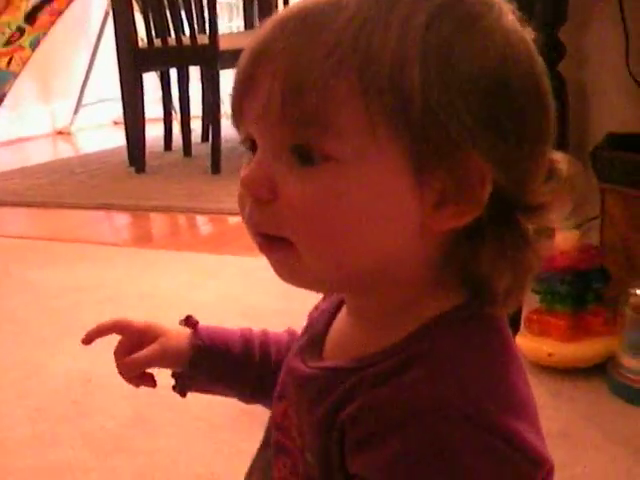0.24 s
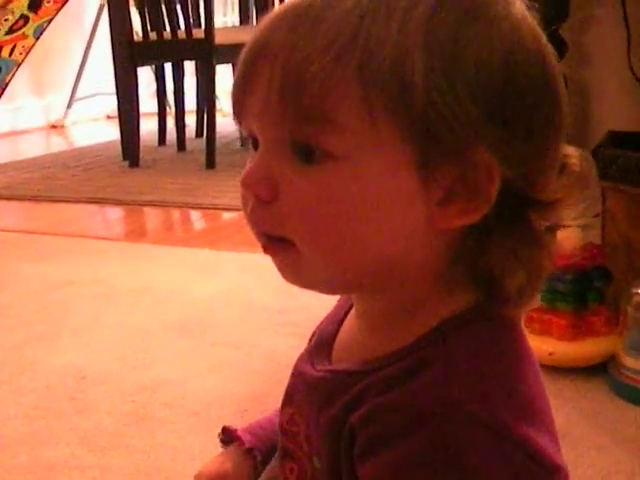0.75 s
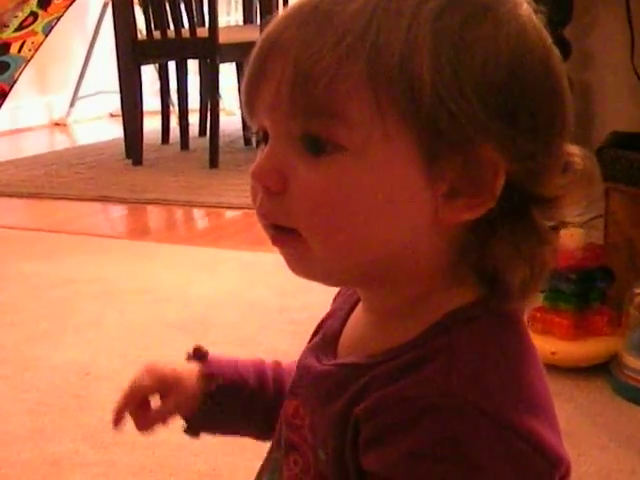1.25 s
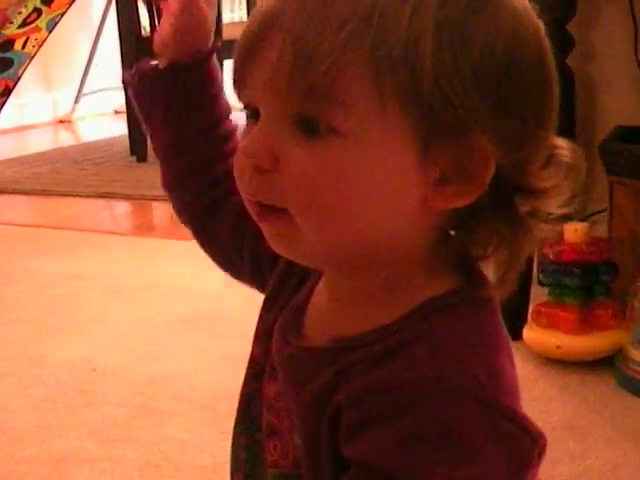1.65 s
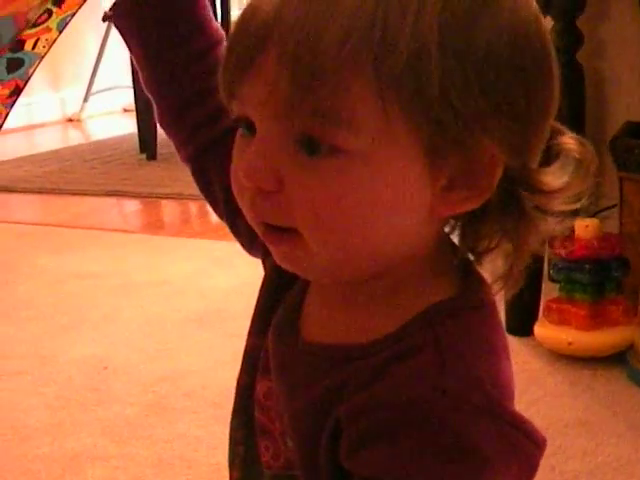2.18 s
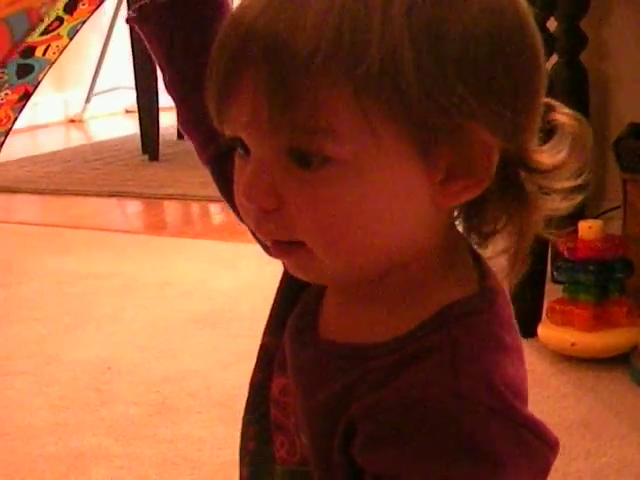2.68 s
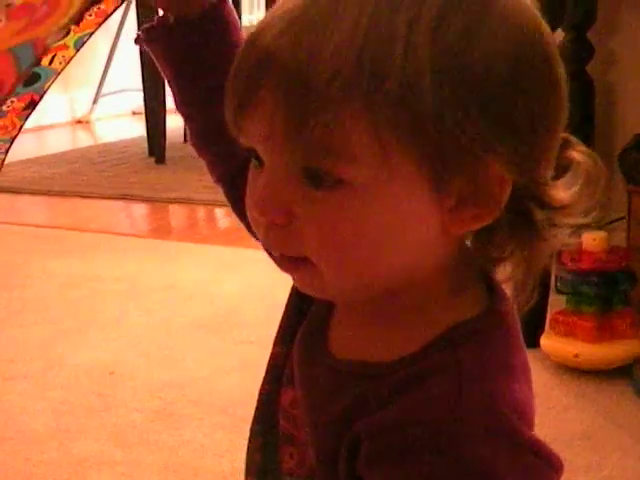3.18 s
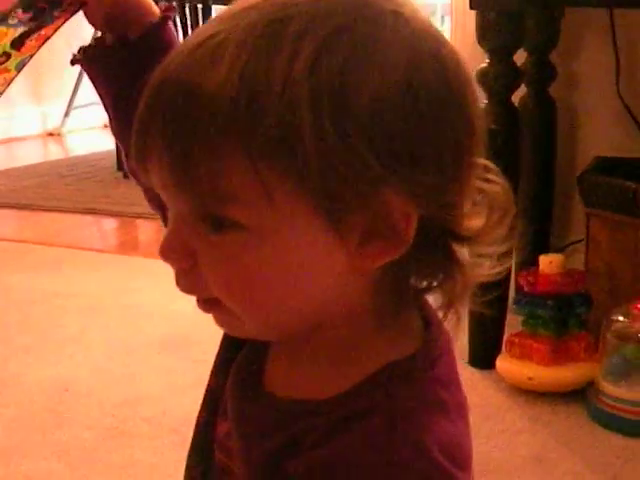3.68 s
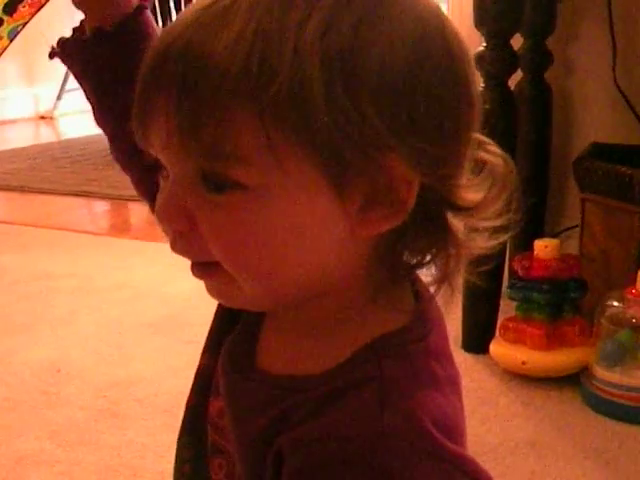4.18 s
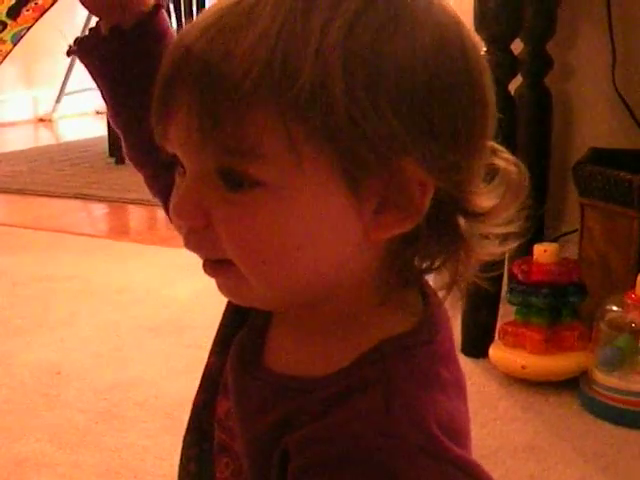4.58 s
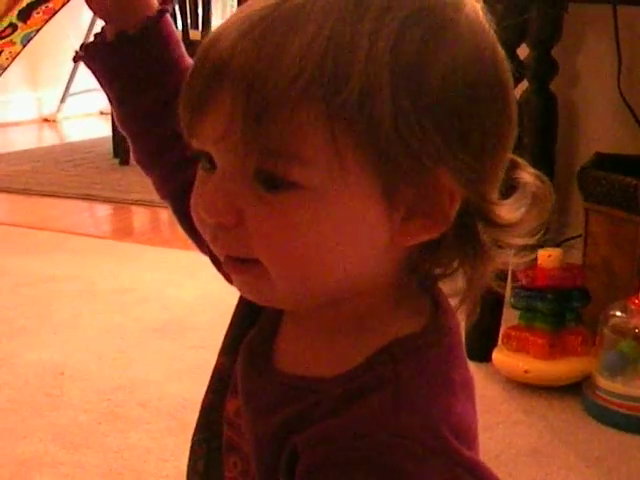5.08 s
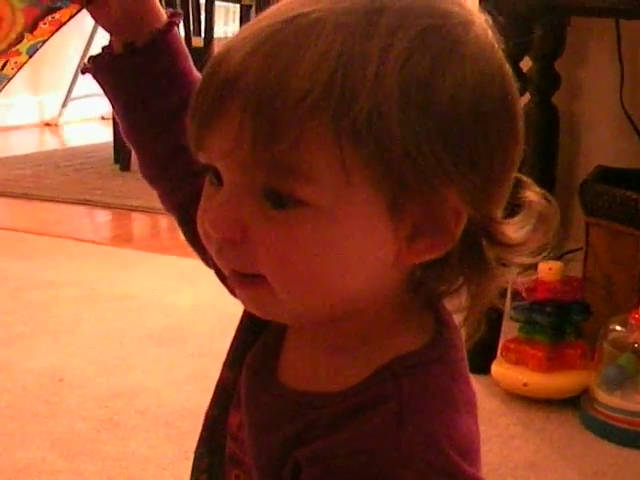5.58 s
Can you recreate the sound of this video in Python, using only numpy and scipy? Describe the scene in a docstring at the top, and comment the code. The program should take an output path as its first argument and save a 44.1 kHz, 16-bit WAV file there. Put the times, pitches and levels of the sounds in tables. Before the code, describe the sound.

Near a small camera in a carpeted room, low rumble and faint hiss run throughout. After two quiet seconds, a hand taps and brushes stretched tent cloth, with soft drummy thumps and crisp swishes. Lighter pats and rustles follow, then a sharp snag with a snap leads into rhythmic rubbing and short fingertip zips.

```python
"""A hand pats, brushes and then keeps rubbing the taut cloth of a play tent, close to a small camera.
Taps are a noise tick plus decaying panel modes; brushes and rubbing are grainy shaped noise.
Fingertips over the weave are short pitch-swept tones: arching zips, harsh snags and one snap.
A carpeted room answers with sparse echoes and a decaying noise tail.
Underneath lie a steady low room rumble and a soft, slightly wavering hiss."""
import sys
import numpy as np
from scipy import signal
from scipy.fft import rfft, irfft, next_fast_len
from scipy.io import wavfile
from scipy.ndimage import uniform_filter1d, map_coordinates

SR = 44100
rng = np.random.default_rng(int(sys.argv[2]) if len(sys.argv) > 2 else 0)


def master(y):
    """Save y as 16-bit WAV."""
    cut = np.clip(np.atleast_2d(y).T, -1, 1)
    pcm = np.round(cut * 32767)  # scale
    wavfile.write(sys.argv[1], SR, pcm.astype(np.int16))


N = 257544

# background spectra: (frequency [Hz], density [dB per Hz])
RUMBLE_SPECTRUM = [(20, -29), (45, -18.5), (70, -6.5), (86, -1), (99, -1.5), (117, 7.5), (143, -1.5),
                   (200, -2), (255, 0), (300, -8.5), (370, -36), (600, -65)]
AIR_SPECTRUM = [(100, -4), (400, 0), (1000, 2), (1800, 1), (3000, -3), (5000, -8), (7000, -11),
                (10500, -13), (13500, -29)]
# stereo spread of the background: (frequency [Hz], side minus mid [dB])
BACKGROUND_SPREAD = [(60, -2), (110, -7.5), (200, 2.5), (370, 6), (670, 4.5), (1230, 4), (2250, 4.5),
                     (4110, 6.5), (7510, 3), (13700, -1.5)]
# room decay: (frequency [Hz], t60 [s])
ROOM_DECAY = [(150, 0.65), (1000, 0.52), (3500, 0.31), (7000, 0.32), (13000, 0.22)]

# light taps, and the thumps of the strongest brushes (2.089 s, 4.735 s) on the panel: (time [s], tick level
# [dB], thump level [dB], tilt of the panel's ring [dB per octave])
TAPS = [(2.034, -33, -27.5, 8.5), (2.089, -59, -33, 11), (2.622, -53.5, -41.5, -3),
        (3.373, -41.5, -34.5, -3.5), (3.425, -57, -36.5, -0.5), (3.755, -65, -41.5, -9),
        (4.385, -37, -42.5, 2), (4.735, -51, -37, 3)]
# modes of the stretched panel: (frequency [Hz], level [dB], t60 [s])
PANEL_MODES = [(118.5, -10, 0.4), (153, 1.5, 0.22), (177, -3.5, 0.39), (246.5, -11, 0.18), (293, -8, 0.14)]
# contact noise of a tap: (frequency [Hz], density [dB per Hz])
TICK_SPECTRUM = [(40, -20), (200, -14), (520, -5.5), (760, -3.5), (1100, -5.5), (2400, -2.5), (5000, -10),
                 (7000, -27), (13000, -20)]
TILT_PIVOT_HZ = 170
THUMP_LAG_S, THUMP_ATTACK_S = 0.00495, 0.0058  # the panel yields just after the tick
TICK_T60_S = 0.04
REBOUND_S, REBOUND_DB = 0.0076, -5  # the finger chatters twice more, each time more lightly

# fingertips sliding over the weave:
# (time [s], level [dB], width [s], top pitch [Hz], pitch scatter [share])
ZIPS = [(4.028, -37, 0.02, 2052, .06), (4.262, -35.5, 0.017, 2014, .055), (4.518, -31.5, 0.014, 2080, .11),
        (4.56, -34.5, 0.013, 2280, 0.042), (4.812, -37.5, 0.012, 2540, 0.05),
        (5.087, -31.5, 0.011, 2082, 0.033), (5.329, -37, .012, 1380, .11), (5.363, -35, .014, 2241, .033),
        (5.586, -33.5, 0.016, 1973, .14), (5.623, -32, 0.012, 2350, .03), (5.832, -30, 0.016, 2230, .12)]
# a fingertip snags and skids free: (time [s], level [dB], width [s], pitch [Hz])
SNAGS = [(2.076, -25, .003, 4990), (4.1048, -16.5, 0.0027, 4150), (4.728, -23, .007, 2600),
         (5.216, -39, .005, 2555)]
ZIP_ARCH_EXPONENT = 0.16  # how closely pitch follows the finger's speed
SNAG_SCATTER_SHARE = 0.131
GRIP_DB = 1.6
# the hardest snag lets go with a snap
SNAP_S, SNAP_DB, SNAP_WIDTH_S, SNAP_HZ = 4.1057, -15, 0.00093, 4180

# quick brushes: (time [s], level [dB], length [s], fizz against swish [dB], centre [Hz])
SWIPES = [(0.09, -59, .52, -1, 3000), (2.087, -24, 0.057, -3.5, 3620), (2.359, -51.5, .13, -4.5, 2090),
          (2.444, -39.5, 0.11, -4, 5070), (2.71, -23, 0.068, -2, 4100), (2.945, -55, 0.19, -5, 5500),
          (3.155, -48.5, 0.17, 1, 6170), (3.168, -40.5, 0.035, 2, 2840), (3.228, -39, 0.057, 3.5, 6500),
          (3.327, -52, 0.13, 1, 6150), (3.436, -52, 0.48, -4, 2200), (3.609, -40, .11, -3, 4500),
          (4.108, -35.5, 0.077, -2, 3170), (4.731, -27.5, 0.072, -0.5, 2850),
          (5.214, -34.5, 0.063, 1.5, 2500)]
# brush noise, low and high part: (frequency [Hz], density [dB per Hz])
SWISH_SPECTRUM = [(40, -50), (150, 5), (400, -19.5), (650, -4.5), (1000, -7), (1600, -3), (2700, -3),
                  (5200, -10), (6500, -9.5), (9000, -14), (14000, -12)]
FIZZ_SPECTRUM = [(2500, -52), (5000, 5), (7000, -7), (9000, -2.5), (11000, 2), (13500, -7.5)]
# cloth resonances that colour every brush: (frequency [Hz], width [Hz], level [dB])
CLOTH_RESONANCES = [(857, 49, -4), (1220, 78, -0.5), (1390, 94, -1.5), (1800, 83, 2), (1894, 170, 0.5),
                    (2552, 108, 4), (3000, 230, -2), (3730, 110, 0), (4310, 110, -1.5), (4896, 186, 3),
                    (5050, 260, -2.5), (5340, 120, 1)]
SWIPE_RISE_SHARE = 0.47  # of the length; the rest is the fall
COLOUR_DB, COLOUR_OCTAVES = 5, 0.65  # lift around a brush's centre
FIZZ_LEAD_S = 0.0038  # the light first touch fizzes just ahead of the swish
SWIPE_GRAIN_DB = 1.4  # how unevenly the hand catches
# the cloth settles after every brush with a rustle; level is against the brush
SETTLE_DB, SETTLE_DELAY_S, SETTLE_RISE_S, SETTLE_FALL_S = -18, 0.016, 0.035, 0.1
SETTLE_HZ = 2400

# the rubbing hand pushes out: (time [s], level [dB])
PUSHES = [(4.02, -41), (4.248, -39), (4.49, -37), (4.78, -40.5), (5.029, -42.5), (5.295, -37),
          (5.572, -34.5), (5.818, -35)]
PUSH_RISE_S, PUSH_FALL_S, PUSH_FIZZ_DB = 0.077, 0.087, 2.5
# and draws back, speeding up slowly and stopping short: (time [s], level [dB])
PULLS = [(4.125, -41), (4.374, -37), (4.632, -36), (4.91, -38.5), (5.173, -35), (5.436, -36),
         (5.713, -34.5)]
PULL_RISE_S, PULL_FALL_S, PULL_FIZZ_DB = 0.17, 0.066, 0.5
# how strongly rubbing stirs the whole panel: (time [s], level [dB])
STIR = [(3.9, -62.5), (4.08, -47), (4.7, -44), (4.78, -36.5), (4.84, -46), (5.33, -43.5), (5.5, -45),
        (5.84, -43.5)]
# rubbing noise of panel and contact: (frequency [Hz], density [dB per Hz])
BODY_SPECTRUM = [(30, -19), (80, -5), (170, 5), (280, 7), (390, -13), (600, -7.5), (900, 1.5), (1100, -0.5),
                 (1400, -2), (2000, -3), (3000, -2.5), (5000, -10.5), (9000, -14)]
HISS_SPECTRUM = [(100, -61), (1000, -14.5), (2200, -5), (3500, 1), (5500, 2), (7000, 0), (9000, -1),
                 (13500, -47)]

TOP_HZ, NOTCH_HZ, NOTCH_WIDTH_HZ = 13650, 7950, 820  # camera response


def amp(db):
    """Decibels to gain."""
    return 10 ** (np.asarray(db) / 20)


def unit(x):
    """Scaled to rms 1."""
    return x / np.sqrt(np.mean(x ** 2) + 1e-20)


def clock_s():
    """The time of every sample."""
    return np.arange(N) / SR


def along(points, hz):
    """(Hz, value) points interpolated on a log frequency axis."""
    f, v = np.transpose(points)
    return np.interp(np.log(hz + 1), np.log(f + 1), v)


def wobble(rate_hz):
    """A smooth random curve, rate_hz knots a second."""
    knots = rng.standard_normal(int(N * rate_hz / SR) + 4)
    return map_coordinates(knots, [np.arange(N) * rate_hz / SR])


def filtered(x, response):
    """x times a complex response of frequency."""
    m = next_fast_len(N + SR // 2)
    return irfft(rfft(x, m) * response(np.fft.rfftfreq(m, 1 / SR)), m)[..., :N]


def coloured(x, spectrum):
    """x shaped by a spectrum, at rms 1."""
    return unit(filtered(x, lambda hz: amp(along(spectrum, hz))))


def placed(x, left_db, lead_ms):
    """A source to one side is louder and earlier in the nearer microphone."""
    sides = np.array([[.5], [-.5]])
    shifted = filtered(x, lambda hz: np.exp(2j * np.pi * hz * sides * lead_ms / 1000))
    return amp(left_db * sides) * shifted


def background(spectrum, mid_db):
    """Steady noise from independent mid and side parts, spread by frequency."""
    mid, side = coloured(rng.standard_normal((2, N)), spectrum)
    side = filtered(side, lambda hz: amp(along(BACKGROUND_SPREAD, hz)))
    return amp(mid_db) * np.array([mid + side, mid - side])


def room(x, near_db, early_db, tail_db):
    """Nearest cloth answers both microphones alike, furniture each differently, then the room decays."""
    hz, t, z = signal.stft(rng.standard_normal((2, SR // 2)), SR, nperseg=256)
    decay = amp(-60 * t / along(ROOM_DECAY, hz)[:, None])
    response = signal.istft(z * decay, SR, nperseg=256)[1]
    response *= amp(tail_db) / np.linalg.norm(response[0])
    for side in response:
        delays_s = rng.uniform(.004, .026, size=8)
        side[(delays_s * SR).astype(int)] += amp(early_db) * rng.choice([-1, 1], size=8) / np.sqrt(8)
    delays_s = rng.uniform(.002, .009, size=4)
    response[:, (delays_s * SR).astype(int)] += amp(near_db) * rng.choice([-1, 1], size=4) / 2
    return x + signal.fftconvolve(x, response, axes=1)[:, :N]


def friction(spectrum, grain_db):
    """Countless tiny thread slips, in clumps of uneven strength, their colour shifting in patches."""
    z = signal.stft(rng.standard_normal(N) * amp(grain_db * wobble(900)), nperseg=512)[2]
    field = uniform_filter1d(rng.standard_normal(z.shape), size=4, axis=0)
    field = uniform_filter1d(field, size=5, axis=1)
    slips = signal.istft(z * amp(2.6 * unit(field)), nperseg=512)[1][:N]
    return coloured(slips, spectrum)


def panel_ring(t, tilt):
    """Decaying panel modes, tilted about a pivot; each tap scatters their levels and pitches."""
    chance = rng.standard_normal((len(PANEL_MODES), 2))
    ring = np.zeros(len(t))
    for (hz, db, t60), (a, b) in zip(PANEL_MODES, chance):
        level_db = db + tilt * np.log2(hz / TILT_PIVOT_HZ) + 0.83 * a
        ring += amp(level_db - 60 * t / t60) * np.sin(2 * np.pi * hz * (1 + 0.019 * b) * t)
    return ring


def taps():
    """A finger ticks on the cloth, chatters briefly and sets the panel drumming; the strongest brushes thump it
    too."""
    t = np.arange(SR // 2) / SR
    ticks, thumps = np.zeros(N + SR), np.zeros(N + SR)
    for s, tick_db, thump_db, tilt in TAPS:
        thump = panel_ring(t, tilt) * (1 - np.exp(-t / THUMP_ATTACK_S))
        thumps[round((s + THUMP_LAG_S) * SR):][:len(t)] += amp(thump_db) * thump
        for k in range(3):
            tick = amp(tick_db + k * REBOUND_DB - 60 * t / TICK_T60_S)
            ticks[round((s + k * REBOUND_S) * SR):][:len(t)] += tick
    contact = ticks[:N] * friction(TICK_SPECTRUM, grain_db=4.0)
    return placed(thumps[:N] + contact, left_db=-0.5, lead_ms=0)


def weave(pitch_hz):
    """The tone of threads passing under a fingertip, with a weak octave."""
    phase = 2 * np.pi * np.cumsum(pitch_hz) / SR
    return np.sin(phase) + amp(-17) * np.sin(2 * phase)


def zips():
    """Thread rate follows finger speed: a zip arches in pitch, a snag is one sharp spurt."""
    t, out = clock_s(), np.zeros(N)
    unevenness, grip = wobble(1300), amp(GRIP_DB * wobble(300))
    for s, db, width, top_hz, scatter in ZIPS:
        near = np.abs(t - s) < 4 * width
        slide = np.exp(-.5 * ((t[near] - s) / width) ** 2)
        pitch_hz = top_hz * slide ** ZIP_ARCH_EXPONENT * (1 + scatter * unevenness[near])
        out[near] += amp(db) * slide * weave(pitch_hz)
    for s, db, width, hz in SNAGS:
        near = np.abs(t - s) < 6 * width
        spurt = np.exp(-np.abs(t[near] - s) / width)
        out[near] += amp(db) * spurt * weave(hz * (1 + SNAG_SCATTER_SHARE * unevenness[near]))
    snap = amp(SNAP_DB) * np.exp(-.5 * ((t - SNAP_S) / SNAP_WIDTH_S) ** 2)
    snap *= np.sin(2 * np.pi * SNAP_HZ * (t - SNAP_S))
    return placed(grip * out + snap, left_db=1.0, lead_ms=0.025)


def resonances(hz):
    """Response of the cloth's narrow resonances, alternating in sign."""
    return sum((-1) ** k * amp(db) * 1j * hz * w / (c * c - hz * hz + 1j * hz * w)
               for k, (c, w, db) in enumerate(CLOTH_RESONANCES))


def stroke(s, db, rise_s, fall_s):
    """A stroke swells and fades by 20 dB over its rise and fall."""
    t = clock_s()
    away = np.maximum((s - t) / rise_s, (t - s) / fall_s)
    return amp(db - 20 * np.minimum(away, 10) ** 1.11)


def brushed(grain, centre_hz):
    """Fresh threads for every brush, lifted around a centre frequency."""
    def lift(hz):
        octaves = np.log2((hz + 1) / centre_hz)
        return amp(COLOUR_DB * np.exp(-(octaves / COLOUR_OCTAVES) ** 2))
    return unit(filtered(np.roll(grain, rng.integers(N)), lift))


def swipes():
    """Brushes straight ahead: a swish in the cloth's resonances, fizz on top, then the cloth settles."""
    ringing = unit(filtered(friction([(300, 0), (6000, 0)], grain_db=2.5), resonances))
    grain = amp(-1.0) * friction(SWISH_SPECTRUM, grain_db=0.0) + amp(-1) * ringing
    swish, fizz, settle = np.zeros((3, N))
    for s, db, length, fizz_db, centre_hz in SWIPES:
        rise, fall = length * SWIPE_RISE_SHARE, length * (1 - SWIPE_RISE_SHARE)
        swish += stroke(s, db, rise, fall) * brushed(grain, centre_hz)
        fizz = np.hypot(fizz, stroke(s - FIZZ_LEAD_S, db + fizz_db, rise, fall))
        rustle = stroke(s + SETTLE_DELAY_S, db + SETTLE_DB, SETTLE_RISE_S, SETTLE_FALL_S)
        settle = np.hypot(settle, rustle)
    swish = (swish + settle * brushed(grain, SETTLE_HZ)) * amp(SWIPE_GRAIN_DB * wobble(250))
    return placed(swish + fizz * friction(FIZZ_SPECTRUM, grain_db=2.0), left_db=0.1, lead_ms=0.014)


def rubbing():
    """The hand goes to and fro: the whole panel drums softly, the contact on the left hisses."""
    s, stir_db = np.transpose(STIR)
    stir = amp(np.interp(clock_s(), s, stir_db, left=-120))
    body = stir * friction(BODY_SPECTRUM, grain_db=2.0)
    push = np.linalg.norm([stroke(s, db, PUSH_RISE_S, PUSH_FALL_S) for s, db in PUSHES], axis=0)
    pull = np.linalg.norm([stroke(s, db, PULL_RISE_S, PULL_FALL_S) for s, db in PULLS], axis=0)
    hiss = np.hypot(push, pull) * friction(HISS_SPECTRUM, grain_db=0.5)
    fizz = np.hypot(push * amp(PUSH_FIZZ_DB), pull * amp(PULL_FIZZ_DB))
    fizz = fizz * friction(FIZZ_SPECTRUM, grain_db=0.0)
    contact = placed(hiss, left_db=10.0, lead_ms=0.073) + placed(fizz, left_db=8.5, lead_ms=0.1355)
    pressure = amp(1.33 * wobble(70))
    return pressure * (placed(body, left_db=-0.6, lead_ms=0.012) + contact)


def scene():
    """The handled cloth in the room, over rumble and a hiss that wavers slightly."""
    cloth = room(swipes() + rubbing() + zips() + taps(), near_db=-12.0, early_db=-17, tail_db=-9.5)
    waver = amp(.3 * wobble(5))
    rumble = background(RUMBLE_SPECTRUM, mid_db=-51.0)
    air = background(AIR_SPECTRUM, mid_db=-58) * waver
    return cloth + rumble + air


def record(dry):
    """The camera has a narrow notch in the treble and keeps nothing above its band limit."""
    def response(hz):
        off = (hz - NOTCH_HZ) ** 2
        return (off / (off + NOTCH_WIDTH_HZ ** 2)) ** 0.9 * (hz < TOP_HZ)
    return filtered(dry, response)


dry = scene()
out = record(dry)
master(out)
```